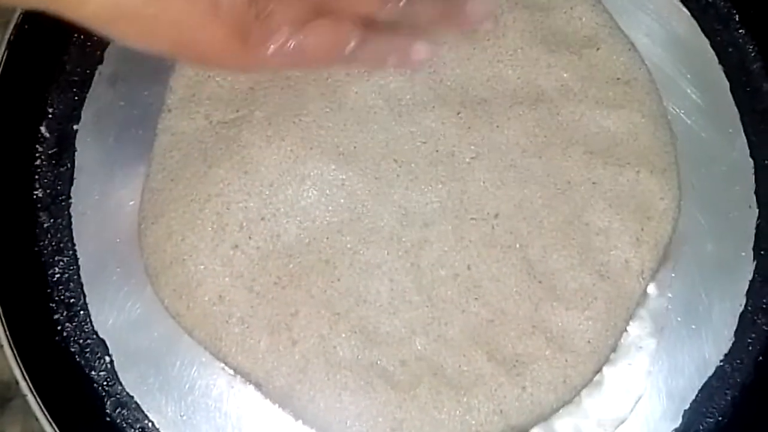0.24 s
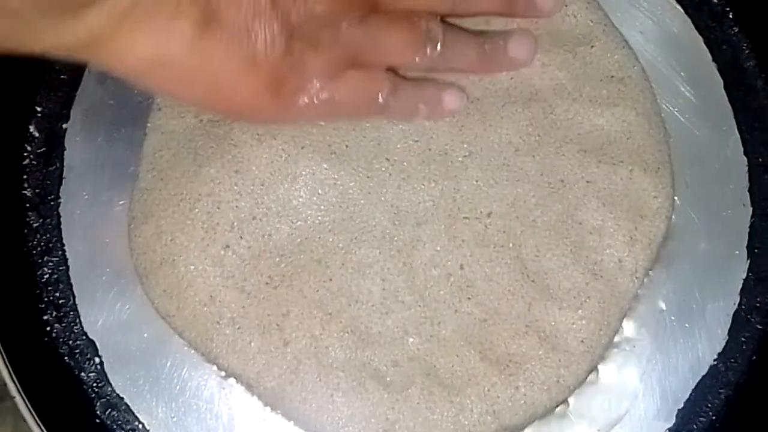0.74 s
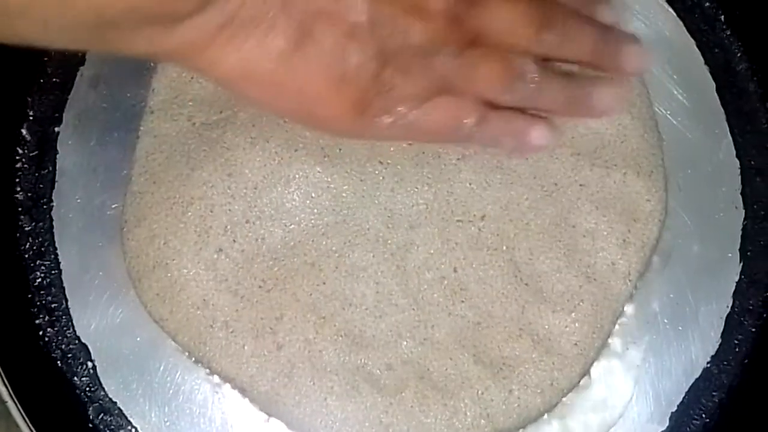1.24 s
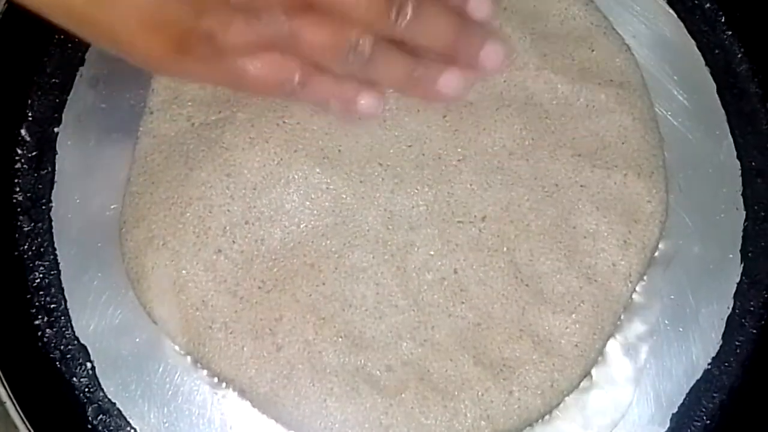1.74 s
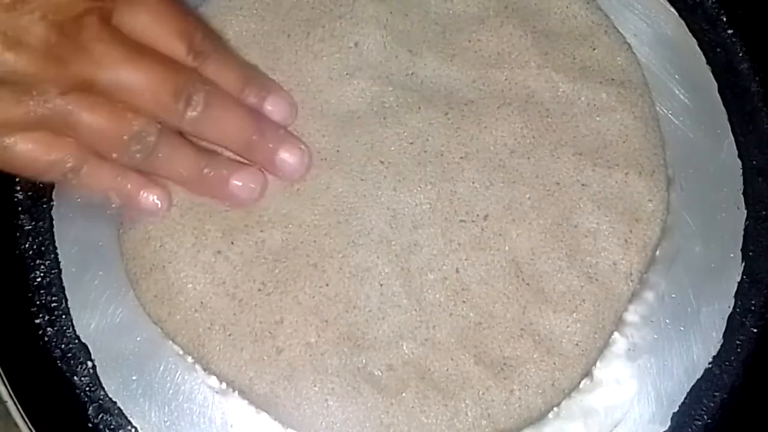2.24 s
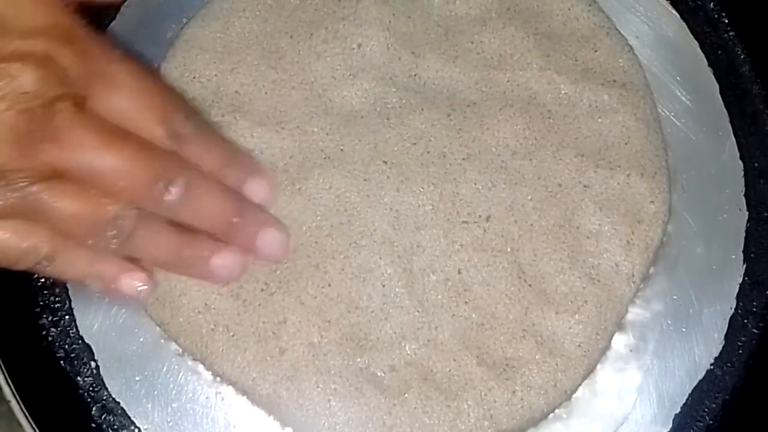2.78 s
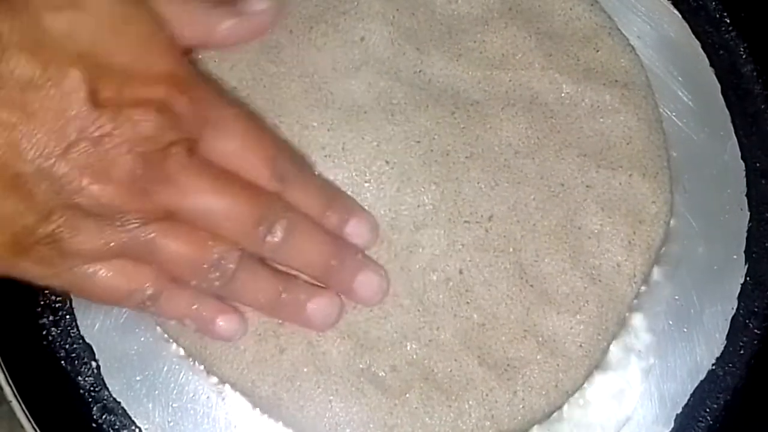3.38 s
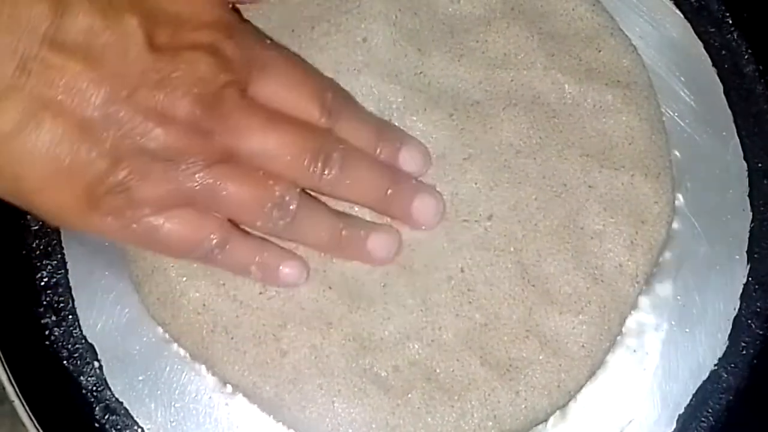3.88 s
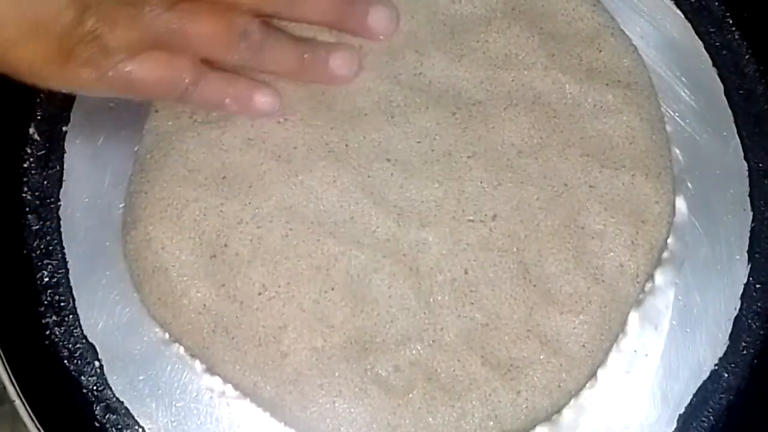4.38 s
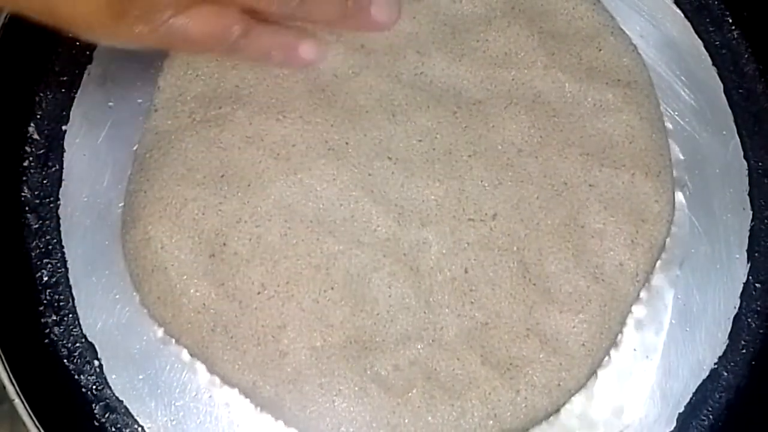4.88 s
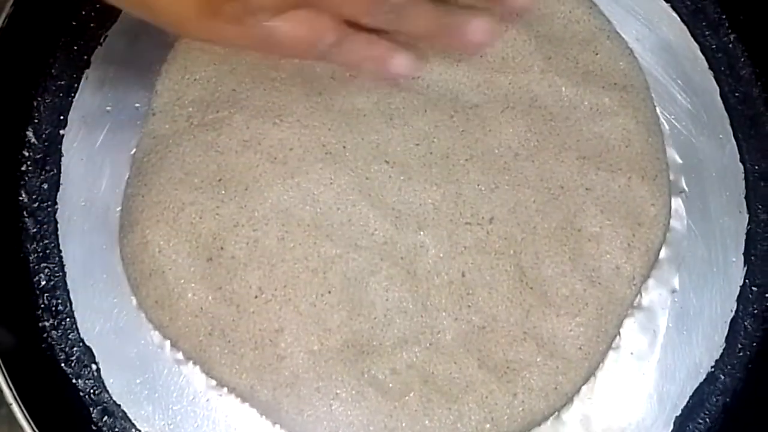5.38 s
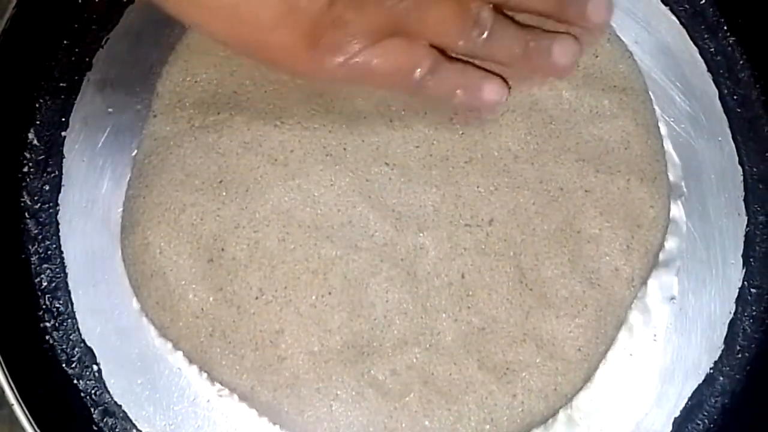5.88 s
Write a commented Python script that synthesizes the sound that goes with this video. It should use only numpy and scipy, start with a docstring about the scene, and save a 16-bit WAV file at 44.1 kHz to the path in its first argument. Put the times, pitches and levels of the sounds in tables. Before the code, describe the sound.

Flat dough fries in a little hot fat on a metal griddle. A faint, high sizzle comes in short, uneven bursts that flare and die away, dotted with small sharp pops and ticks of spitting droplets. A hand pats the dough now and then, giving very soft, muffled knocks from the pan. The sharpest pops come in the second half. The microphone is close, in a quiet kitchen.

```python
"""Flat dough frying on a griddle

Dough fries in hot fat, close by in a quiet kitchen, while a hand pats it and knocks the pan.
Steam crackles out from under the rim in bursts; pockets pop, droplets spit, bubbles and pan ring.
Beneath it all lie soft room air, a low rumble and a faint, wavering hum."""
import sys
import numpy as np
from scipy import signal
from scipy.io import wavfile
from scipy.ndimage import uniform_filter1d

SR = 44100
rng = np.random.default_rng(int(sys.argv[2]) if len(sys.argv) > 2 else 0)


def transcribe(signal):
    """Save signal, clipped to [-1, 1], as a 16-bit WAV file at the path in sys.argv[1]."""
    frames = np.atleast_2d(signal).T
    limited = np.clip(frames, -1, 1)
    pcm = np.round(limited * 32767).astype(np.int16)
    wavfile.write(sys.argv[1], SR, pcm)


N = 269892

# Tone colour (how strong each pitch is) of the steam's main crackle: f/Hz, level/dB
CRACKLE_COLOUR = [(2600, -50), (3300, -10.5), (3800, -11), (4400, 6.5), (5000, -2.5), (6500, -9.5),
                  (7400, -14.5), (9000, -31), (12000, -48)]
# Tone colour of the fine spray: f/Hz, level/dB
SPRAY_COLOUR = [(4410, -5.5), (7500, -13.5), (8970, -16.5), (9800, -14), (11200, -12.5), (15300, 0),
                (15900, -7.5), (16150, -37), (16900, -44.5)]
# Tone colour of the deep sputter from big steam pockets: f/Hz, level/dB
SPUTTER_COLOUR = [(900, -26.5), (1250, -24.5), (1800, -23.5), (2400, -11), (3000, 1), (3500, 2.5),
                  (4200, 1.5)]
# How bright the crackle is as the steam finds other gaps: t/s, tilt/(dB per octave)
BRIGHTNESS = [(0, 0), (.5, 7), (.6, -2), (.75, 7.5), (1.33, 7), (1.4, -7.5), (1.8, -7.5), (2.15, 11),
              (2.29, -0.5), (3.1, 3), (3.135, 3), (3.2, -14.5), (3.7, 7.5), (5.18, -4), (5.23, 13),
              (5.28, 0), (5.7, 1), (5.8, 19), (5.88, -2), (6.12, 5.5)]


def sizzle():
    """Escaping steam makes a crackle and a deep sputter; a fine spray shares some of their clicks."""
    surge_times = np.arange(0, N / SR, .001)
    levels = [np.interp(np.arange(N) / SR, surge_times, level) for level in steam_surges(surge_times)]
    brightness = np.interp(np.arange(N + 256) / SR, *np.transpose(BRIGHTNESS))
    foam = froth(per_s=2400, spread_db=2.3, ring=45)
    steam = crackle(per_s=2000, spread_db=2.8, hiss=.4, clump_db=2.2) + .8 * foam
    mist = .2 * steam + .5 * foam + crackle(per_s=1400, spread_db=4.1, hiss=.3, clump_db=2.6)
    body = flicker(coloured(steam, CRACKLE_COLOUR), depth_db=3, tilt_db=brightness)
    spray = flicker(coloured(mist, SPRAY_COLOUR), depth_db=2.8)
    sputter = flicker(coloured(steam, SPUTTER_COLOUR), depth_db=3)
    return sum(level * unit_level(layer) for level, layer in zip(levels, (body, spray, sputter)))


def steam_surges(t):
    """Strength of crackle, spray and sputter at times t: each surge breaks out fast, then dies away."""
    # Steam from under the rim: peak t/s, fade/(dB per s), crackle/dB, spray/dB, sputter/dB
    surges = [(0.003, 256.5, -39.5, -58.5, -60.5), (0.09, 42, -59, -52.5, -100),
              (0.177, 152.5, -48, -49, -71), (0.347, 123.5, -69, -67, -86),
              (0.462, 46.5, -69.5, -54.5, -85), (0.565, 80, -55, -90, -65.5),
              (0.694, 119.5, -51.5, -48.5, -60.5), (0.875, 286, -55, -53, -66.5),
              (0.939, 343, -48.5, -52, -66.5), (0.998, 145, -62.5, -58.5, -82),
              (1.117, 54.5, -71, -69, -82.5), (1.314, 114, -51.5, -84, -84), (1.368, 291, -68, -46, -59),
              (1.463, 127, -48.5, -46.5, -58), (1.752, 174, -42, -58, -45.5),
              (1.92, 115.5, -60, -67, -69.5), (2.048, 87, -59, -100, -72.5), (2.173, 170, -60, -68, -66.5),
              (2.305, 90.5, -45, -56, -51), (2.6, 85.5, -46, -53.5, -54.5), (2.723, 49.5, -94, -54, -64),
              (2.798, 125, -51, -64, -59.5), (3.12, 22, -54.5, -70, -60.5), (3.279, 336, -49, -52, -60),
              (3.329, 133, -50.5, -61.5, -55.5), (3.42, 76, -47, -55.5, -49),
              (3.611, 23.5, -50, -62, -55.5), (3.761, 111, -52, -53.5, -46.5),
              (3.937, 118, -54, -50, -51.5), (4.058, 249, -64, -65, -70), (4.129, 123, -69, -61.5, -90),
              (4.255, 95, -49.5, -61, -47.5), (4.316, 100, -65, -60, -54), (4.561, 39, -57, -68, -67.5),
              (4.682, 278, -39.5, -55, -41.5), (4.742, 70, -44, -60.5, -49.5), (4.862, 107, -84, -54, -85),
              (5.022, 257, -46.5, -51, -50.5), (5.101, 175, -56, -66, -65), (5.211, 42, -59.5, -74, -90),
              (5.343, 59.5, -59.5, -61, -66.5), (5.636, 200, -78, -64, -90),
              (5.678, 160, -50.5, -57, -60.5), (5.816, 121, -57, -59, -92),
              (5.886, 64.5, -48.5, -56.5, -49.5)]
    rise_db_per_s, lull_db = 813, -76
    peak_s, fade, *layers = np.array(surges).T[:, :, None]
    shape_db = -rise_db_per_s * np.maximum(peak_s - t, 0) - fade * np.maximum(t - peak_s, 0)
    return [np.sqrt((amp(db + shape_db) ** 2).sum(0) + amp(lull_db) ** 2) for db in layers]


def crackle(per_s, spread_db, hiss, clump_db):
    """Random clicks, few of them large, come in clumps over a hiss."""
    size = amp(spread_db * np.minimum(rng.exponential(1, N), 5)) * rng.choice([-1, 1], N)
    clicks = unit_level(size * (rng.random(N) < per_s / SR))
    return (clicks + hiss * rng.standard_normal(N)) * amp(clump_db * wander(140))


def froth(per_s, spread_db, ring):
    """Countless tiny bubbles, each a dying tone of its own pitch; more ring makes them last longer."""
    when, pitch, odds = rng.random((int(per_s * N / SR), 3)).T
    hz = (1200 + 14800 * pitch)[:, None]
    samples = np.arange(800)
    t = (samples / SR).astype(np.float32)
    size = amp(spread_db * np.minimum(-np.log(odds + 1e-9), 5))[:, None] * hz ** .25
    shape = (1 - np.exp(-t / .0002)) * np.exp(-t * np.sqrt(4000 * hz) / ring)
    pings = size * shape * np.sin(2 * np.pi * hz * t)
    positions = (when * N).astype(int)[:, None] + samples
    return unit_level(np.bincount(positions.ravel(), pings.ravel())[:N])  # add up all the pings


def pops():
    """A steam pocket bursts with a click, coloured like the crackle and deeper when big pockets lead."""
    # Bursting pockets: t/s, level/dB
    pockets = [(0.1855, -32.5), (0.223, -37), (0.361, -38.5), (0.395, -38), (0.4572, -41.5), (0.699, -32),
               (0.7531, -35), (0.775, -34.5), (0.9414, -29.5), (1.3081, -29.5), (1.423, -38), (1.5369, -35),
               (1.7444, -24), (2.401, -43), (2.5919, -33.5), (2.805, -33), (3.273, -35.5), (3.332, -30.5),
               (3.493, -30.5), (3.644, -34), (3.7035, -32), (3.794, -34), (3.853, -32), (3.9318, -21),
               (4.048, -40), (4.678, -17), (4.809, -31.5), (5.0184, -29.5), (5.219, -39.5), (5.687, -24),
               (5.73, -41.5), (5.8088, -46), (5.854, -37), (5.879, -25.5), (5.898, -24), (6.0365, -28),
               (6.0415, -26)]
    out, sputter = np.zeros(N), colour_filter(SPUTTER_COLOUR)
    hz, colour_db = np.transpose(CRACKLE_COLOUR)
    for (start, db), noise in zip(pockets, rng.standard_normal((len(pockets), 3000))):
        crackle_level, _, sputter_level = steam_surges(start + .0028)
        deep_share = .24 * sputter_level / crackle_level
        tilt_db = 1.65 * np.interp(start, *np.transpose(BRIGHTNESS))
        body = colour_filter(np.transpose([hz, colour_db + tilt_db * np.log2(hz / 4700)]))
        pop = amp(db) * burst(body + deep_share * sputter, noise, tail_db=-28.5, tail_s=.014)
        add(out, start, pop)
        add(out, start + .0033, .4 * pop)  # echo off the pan wall
    return out


def spits():
    """Droplets spit with very short, bright ticks; bigger drops reach lower in pitch."""
    # Spitting droplets: t/s, level/dB, weight of the tick's lower part/dB
    droplets = [(0.179, -37, -15), (0.2518, -32.5, -30.5), (0.3618, -33.5, 1.5), (0.4592, -26.5, -34),
                (0.5077, -37.5, -24), (0.6878, -40, -20), (0.7002, -24, -31.5), (0.8565, -37, -43),
                (0.942, -28.5, 0), (1.005, -38, -17), (1.097, -44, -10), (1.114, -42.5, -13),
                (1.4551, -45, -34), (2.177, -40, -11), (2.494, -40, 10), (2.6822, -39, -29),
                (2.7204, -40, -21), (2.7682, -35.5, 2), (2.8054, -35, -8), (3.2734, -32.5, 14),
                (3.296, -34, -26), (3.425, -35, -20), (3.4386, -36, -26), (3.5056, -37.5, -18),
                (3.6235, -25.5, -43), (3.6586, -37, -29), (3.7044, -36, -25), (3.7192, -34, -34),
                (3.7333, -31.5, 7), (3.934, -28.5, -20), (4.47, -40, -49.5), (4.836, -31.5, 12),
                (5.3393, -37.5, -38), (5.6347, -44, -25), (5.881, -33.5, -13), (6.1002, -36.5, -28)]
    out, spray = np.zeros(N), colour_filter(SPRAY_COLOUR)
    low, high = (keep_band(spray, side, hz=11500, order=4) for side in ("low", "high"))
    for (start, db, low_db), noise in zip(droplets, rng.standard_normal((len(droplets), 3000))):
        tick = high + amp(low_db + 5) * low
        add(out, start - .001, amp(db) * burst(tick, noise, tail_db=-33, tail_s=.03))
    return out


def burst(click, noise, tail_db, tail_s):
    """One sharp click with a slightly soft onset, then a dying rattle of smaller ones."""
    t = np.arange(len(noise)) / SR
    kicks = amp(tail_db - 60 * t / tail_s) * noise ** 3
    kicks[66] = 1  # the main click
    return signal.oaconvolve(kicks, click / abs(click).max())


def ringing_tones():
    """Short, wobbling tones that rise a little, as a bubble's does when it nears the surface."""
    # Bubbles in the fat, and two longer rings of the pan: t/s, level/dB, f/Hz, fade time/ms
    rings = [(0.563, -47, 4400, 7.2), (0.591, -28, 4410, 5.1), (1.352, -51, 3280, 6),
             (1.76, -52.5, 1810, 6.6), (1.916, -47, 5100, 9.3), (2.043, -58, 7600, 21),
             (2.0515, -38.5, 4770, 5.7), (2.113, -40, 5720, 4.3), (3.128, -36, 5560, 5.6),
             (3.698, -61.5, 1241, 41), (3.703, -49, 2240, 6.8), (4.056, -32, 4060, 5.8),
             (4.242, -58, 2360, 17), (4.576, -35.5, 3230, 1.7), (4.61, -42, 4810, 11.5),
             (4.681, -68, 1257, 46), (4.841, -45, 3340, 6.4), (4.938, -48, 3290, 4.8),
             (4.95, -54, 8220, 10.4), (5.2183, -39.5, 7020, 3.4), (5.255, -41, 3230, 10),
             (5.263, -41.5, 3800, 4.3), (5.307, -52, 4625, 16), (5.452, -49, 3964, 19),
             (5.4958, -41, 4750, 8.1), (5.574, -62.5, 1970, 4.9), (5.925, -27.5, 4730, 3.5)]
    out, t = np.zeros(N), np.arange(3000) / SR
    for (start, db, hz, fade_ms), noise in zip(rings, rng.standard_normal((len(rings), 3000))):
        age = t * 1000 / fade_ms
        onset = 1 - np.exp(-(t / .0012) ** 2)
        fade = np.exp(-age ** 2) + .2 * np.exp(-age / 1.6)
        wobble = 1 + .44 * smooth(noise, 60)
        tone = np.sin(2 * np.pi * hz * t * (1 + .004 * np.minimum(age, 2)))
        add(out, start, amp(db) * onset * fade * wobble * tone)
    return out


def hand_pats():
    """The palm lands and drags, ringing the dough-muffled pan; its weight shifts the pitch a little."""
    # Knocks of the hand: t/s, level/dB, weight of the high tones/dB
    pats = [(1.394, -65.5, 16.5), (1.456, -62, 3), (1.57, -68.5, 13), (1.757, -68.5, 20),
            (1.956, -54.5, -5), (2.13, -60.5, -46), (2.332, -59, 7), (2.391, -59, 5), (2.584, -57, -13),
            (2.672, -61.5, 12), (3.253, -71, 24.5), (3.292, -70.5, 22), (3.703, -70, 24), (3.789, -67, 6),
            (5.474, -71.5, 18.5), (5.809, -66, 14), (5.877, -58, 14)]
    # The pan's low and high tones: f/Hz, level/dB, time to fade by 60 dB/s
    low_tones = [(484, -5, 0.11), (458.3, -17, 0.15), (560, -25, 0.69)]
    high_tones = [(928, -11.5, 0.33), (1000, 2.5, 0.066), (1154, 0.5, 0.046), (1313, -16, 0.12)]
    out, t = np.zeros(N), np.arange(9000) / SR
    for (start, db, high_db), noise in zip(pats, rng.standard_normal((len(pats), 9000))):
        phase = 2 * np.pi * t * (1 + .012 * noise[0])
        low, high = (sum(amp(level - 60 * t / fade_s) * np.sin(hz * phase) for hz, level, fade_s in tones)
                     for tones in (low_tones, high_tones))
        ring = 1.74 * low + .12 * amp(high_db) * high
        push = noise * (1 - np.exp(-t / .0063)) * np.exp(-t / .071)
        push[150] += 6  # the first contact is a short tap
        add(out, start - .004, amp(db) * signal.oaconvolve(push / np.linalg.norm(push), ring))
    return keep_band(out, "high", hz=400, order=6)


def griddle_ring(x):
    """The metal plate rings along with the frying at its own pitches."""
    # The plate's treble tones: f/Hz, level/dB
    tones = [(4000, -2.5), (4288, -8.5), (4926, 1.5), (5800, -4), (6065, -8.5)]
    width_hz = 50
    return x + sum(amp(db) * signal.lfilter(*signal.iirpeak(hz, hz / width_hz, fs=SR), x)
                   for hz, db in tones)


def close_echoes(x, echo_db, fade_s):
    """Pan, stove and counter throw the sound back in a short, dense tail."""
    t = np.arange(8000) / SR
    tail = rng.standard_normal(len(t)) * amp(-60 * t / fade_s) * (t > .002)
    return x + amp(echo_db) * signal.oaconvolve(x, tail / np.linalg.norm(tail))[:N]


def kitchen():
    """Soft room air, a low rumble that comes and goes, and a faint, wavering hum of fixed tones."""
    # Tone colours of the air and the rumble: f/Hz, level/dB
    air_colour = [(60, -25.5), (252, -33), (574, -12), (703, -3), (1200, -14), (1790, -12),
                  (2000, -17), (2400, -36.5), (3120, -35.5), (5280, -120)]
    rumble_colour = [(200, -10.5), (255, -6.5), (340, 2.5), (480, -5.5), (600, 0)]
    # The rumble's rise and fall: t/s, level/dB
    rumble_levels = [(0.1, -109), (0.42, -111), (2.68, -87.5), (3.02, -100), (3.25, -85.5), (4.56, -90.5),
                     (4.84, -81.5), (5.08, -89.5), (6.12, -83)]
    # Tones of the hum: f/Hz, level/dB
    hum_tones = [(100, -108.5), (650, -91), (700, -91.5), (850, -98.5), (950, -99), (1080, -101),
                 (1163, -102), (1351, -99), (1427, -94), (1755, -101)]
    t, hum = np.arange(N) / SR, np.zeros(N)
    air = unit_level(coloured(rng.standard_normal(N), air_colour))
    rumble = unit_level(coloured(rng.standard_normal(N), rumble_colour))
    rumble *= amp(np.interp(t, *np.transpose(rumble_levels)))
    for hz, db in hum_tones:
        level = amp(db + 2 * wander(2.1) + 3 * wander(25))
        hum += np.sqrt(2) * level * np.sin(2 * np.pi * (hz * t + rng.random()))
    return amp(-86.5) * flicker(air, depth_db=4) + rumble + hum


def flicker(x, depth_db, tilt_db=0):
    """Random patches of time and pitch swell and fade; a tilt above zero brightens the sound."""
    hz, _, spectrum = signal.stft(x, SR, nperseg=256)
    patches = uniform_filter1d(rng.standard_normal(spectrum.shape), size=2, axis=0)
    patches = unit_level(uniform_filter1d(patches, size=11, axis=1))
    octaves = np.clip(np.log2((hz[:, None] + 1) / 4700), -.7, .6)
    tilt = np.broadcast_to(tilt_db, N + 256)[::128][:spectrum.shape[1]]
    return signal.istft(spectrum * amp(depth_db * patches + octaves * tilt), nperseg=256)[1][:N]


def colour_filter(colour):
    """A click with the given tone colour and an energy of 1, also used as a filter."""
    points_hz, db = np.transpose(colour)
    hz = abs(np.fft.fftfreq(4096, 1 / SR))
    log_gain = np.log(amp(np.interp(np.log(hz + 1), np.log(points_hz), db, left=-90, right=-90)))
    spectrum = np.exp(np.conj(signal.hilbert(log_gain)))  # packs the energy at the click's start
    click = np.fft.ifft(spectrum).real[:2048]
    return click / np.linalg.norm(click)


def coloured(x, colour):
    return signal.oaconvolve(x, colour_filter(colour))[:N]


def keep_band(x, side, hz, order):
    """Keep what lies on the "low" or "high" side of hz."""
    return signal.sosfilt(signal.butter(order, hz, side, fs=SR, output="sos"), x)


def wander(per_s):
    """A random drift that changes about per_s times a second."""
    return smooth(rng.standard_normal(N), int(SR / per_s))


def smooth(x, samples):
    """Average neighbouring samples twice, then scale to a level of 1."""
    return unit_level(uniform_filter1d(uniform_filter1d(x, samples), samples))


def unit_level(x):
    """Scale to an average (rms) level of 1."""
    return x / np.sqrt(np.mean(x ** 2) + 1e-30)


def amp(db):
    """Turn decibels into a multiplier."""
    return 10 ** (np.asarray(db) / 20)


def add(mix, start_s, sound):
    part = mix[round(start_s * SR):][:len(sound)]
    part += sound[:len(part)]


def scene():
    """Frying, pats and kitchen in one channel; the frying's sources are too small to make any bass."""
    frying = griddle_ring(sizzle() + pops()) + spits() + ringing_tones()
    frying = close_echoes(frying, echo_db=-9, fade_s=.11)
    frying = keep_band(frying, "high", hz=900, order=6)
    return (frying + hand_pats() + kitchen())[None]


def record(dry):
    """A noise suppressor turns down each band near its own quietest level; the top treble is cut off."""
    top_hz = 16850
    spectrum = signal.stft(dry, SR, nperseg=512)[2]
    power = uniform_filter1d(uniform_filter1d(abs(spectrum) ** 2, size=7, axis=1), size=8, axis=2)
    floor = np.percentile(power, 20, axis=2, keepdims=True)
    above_floor_db = 10 * np.log10(abs(power) / floor + 1e-9)
    gain_db = np.clip(.7 * (above_floor_db - 5), -7, 0)
    quiet = signal.istft(spectrum * amp(gain_db), nperseg=512)[1][:, :N]
    treble_cut = signal.firwin(511, top_hz, window=("kaiser", 9), fs=SR)
    return signal.oaconvolve(quiet, treble_cut[None], "same")


dry = scene()
out = record(dry)
transcribe(out)
```